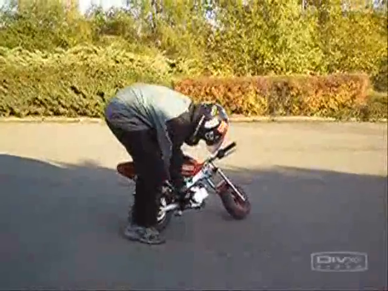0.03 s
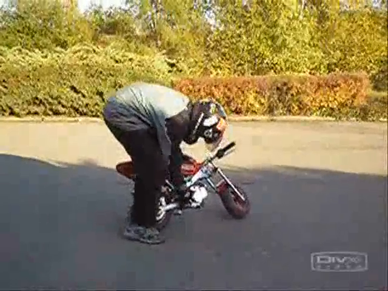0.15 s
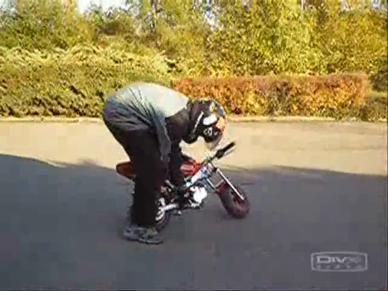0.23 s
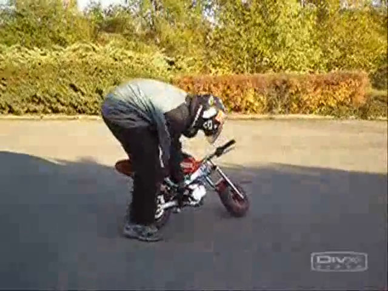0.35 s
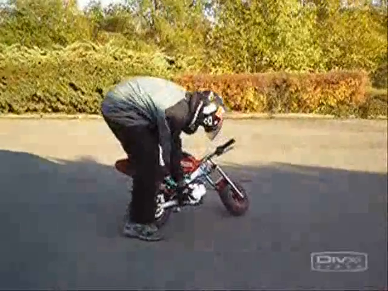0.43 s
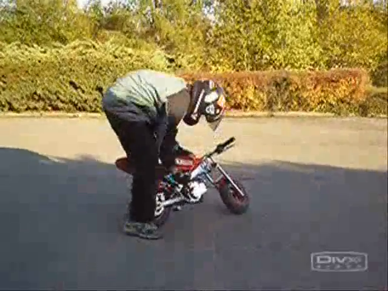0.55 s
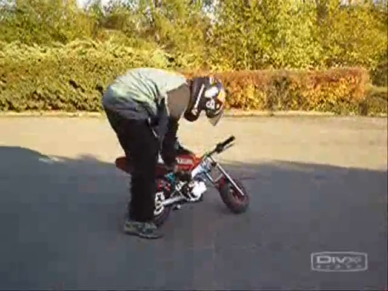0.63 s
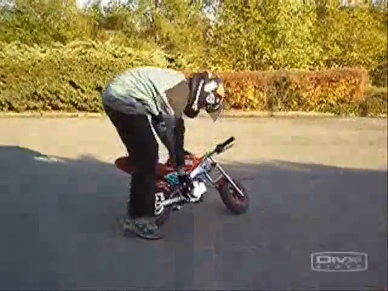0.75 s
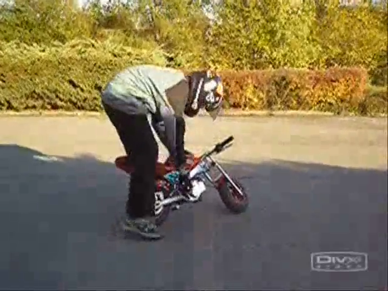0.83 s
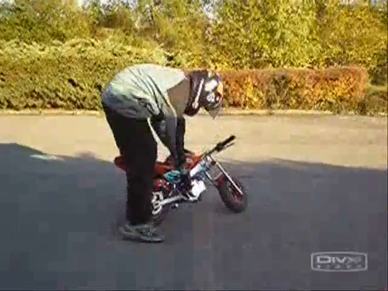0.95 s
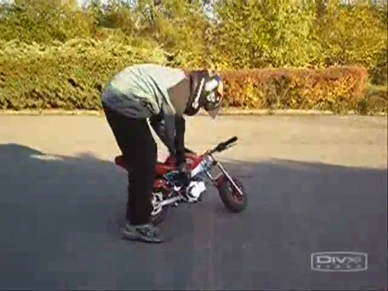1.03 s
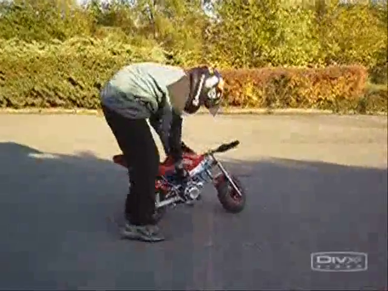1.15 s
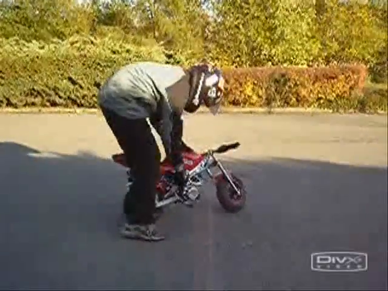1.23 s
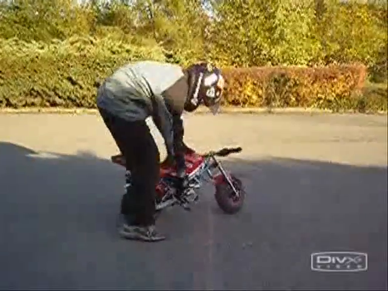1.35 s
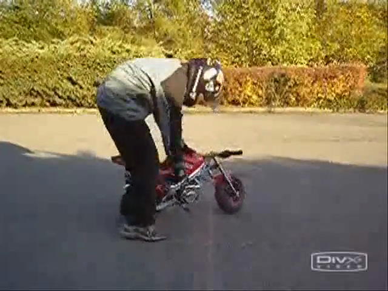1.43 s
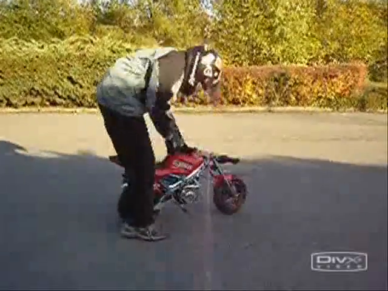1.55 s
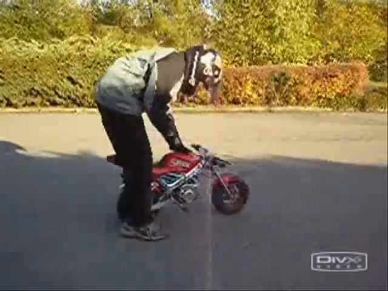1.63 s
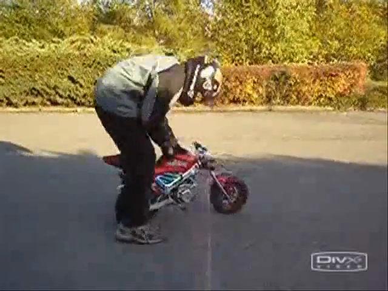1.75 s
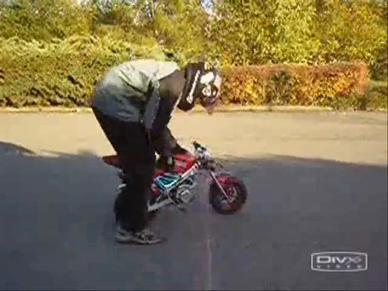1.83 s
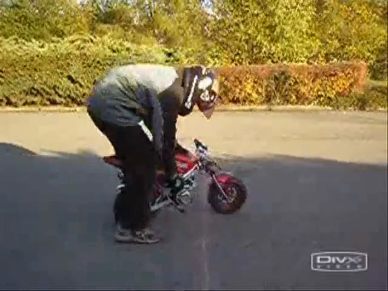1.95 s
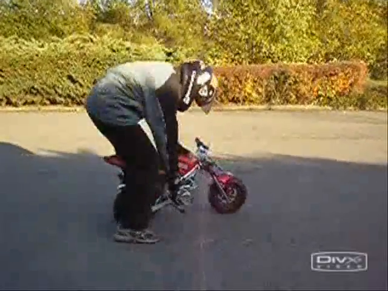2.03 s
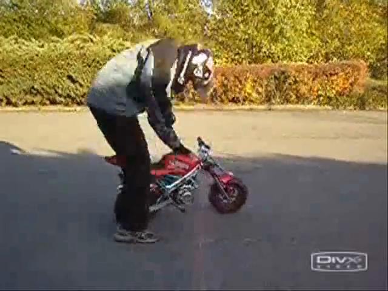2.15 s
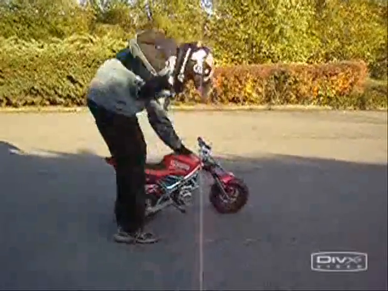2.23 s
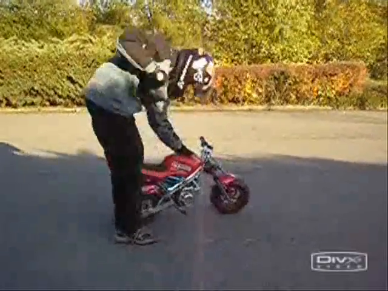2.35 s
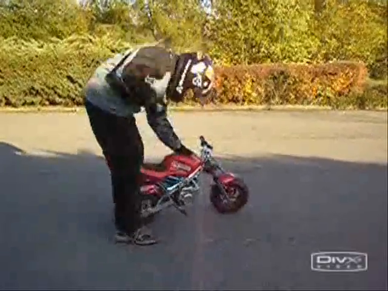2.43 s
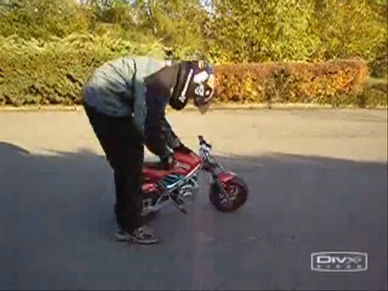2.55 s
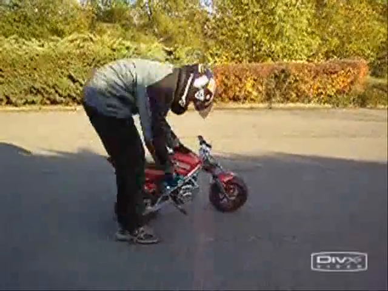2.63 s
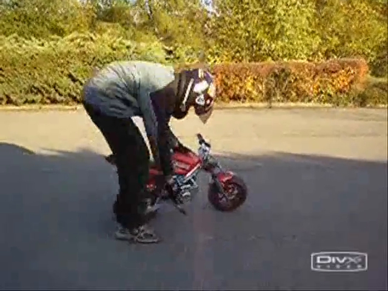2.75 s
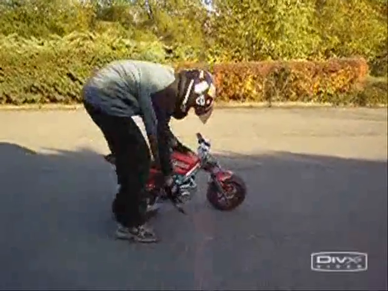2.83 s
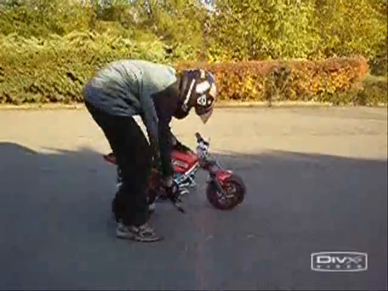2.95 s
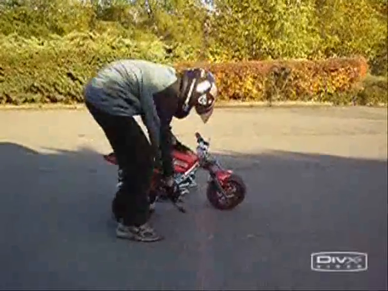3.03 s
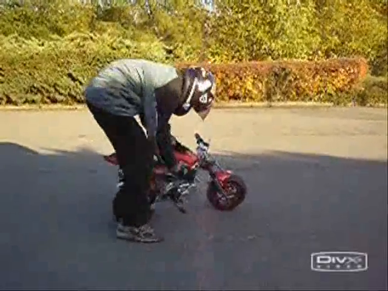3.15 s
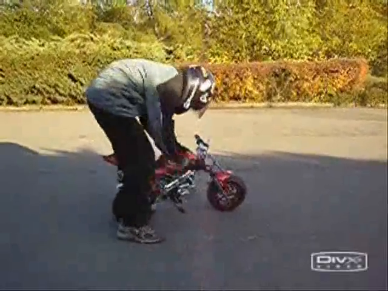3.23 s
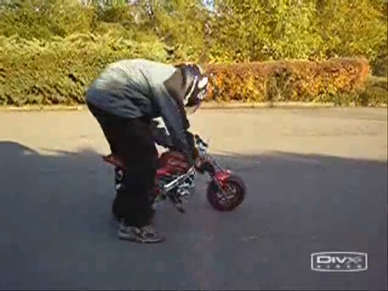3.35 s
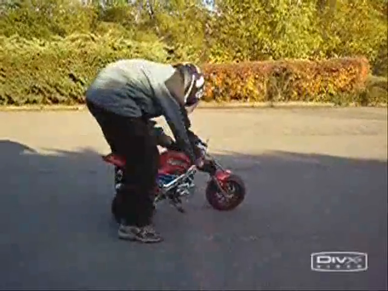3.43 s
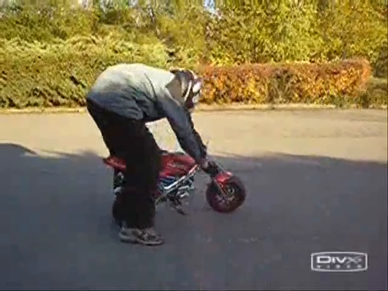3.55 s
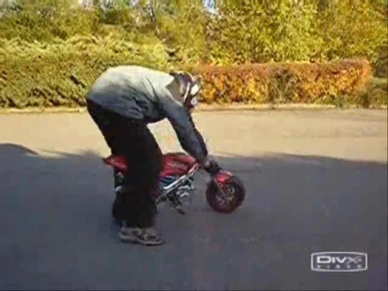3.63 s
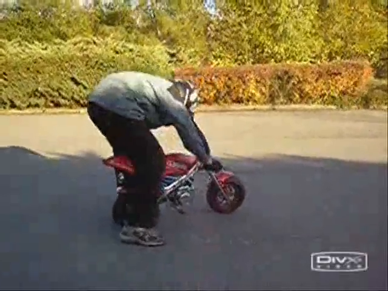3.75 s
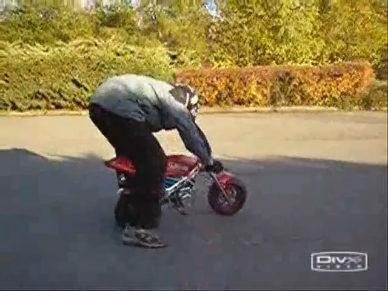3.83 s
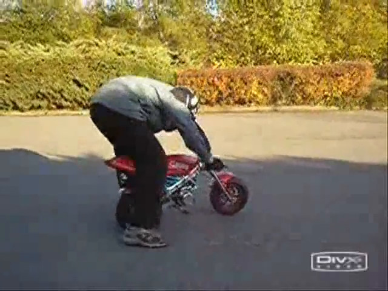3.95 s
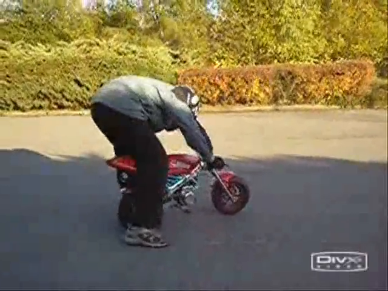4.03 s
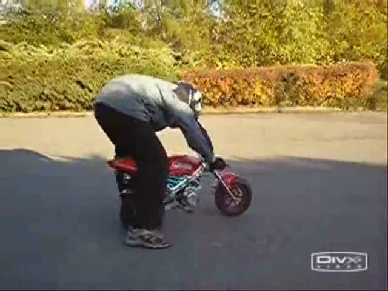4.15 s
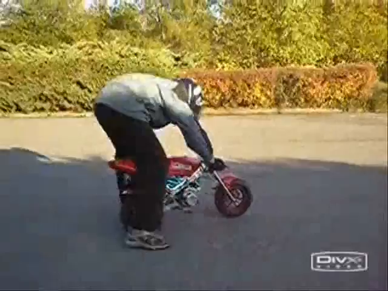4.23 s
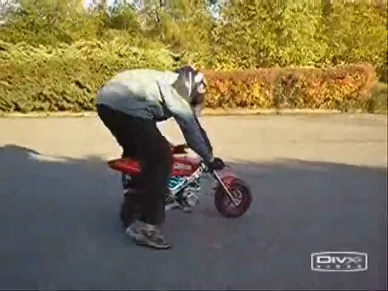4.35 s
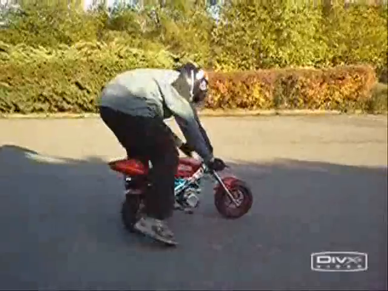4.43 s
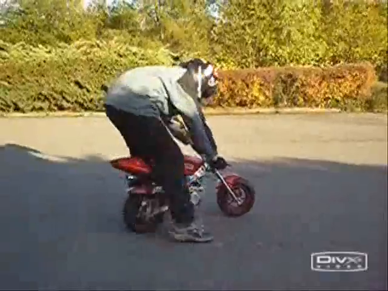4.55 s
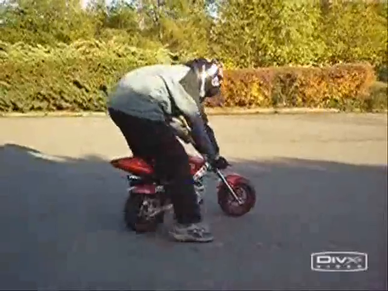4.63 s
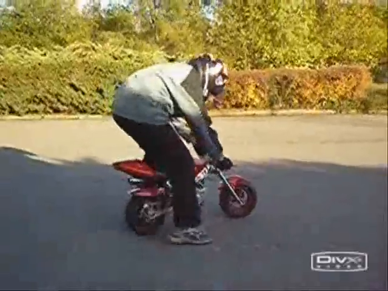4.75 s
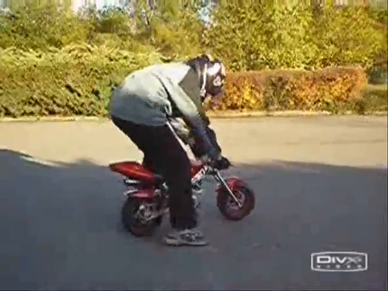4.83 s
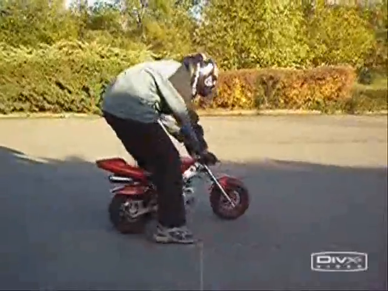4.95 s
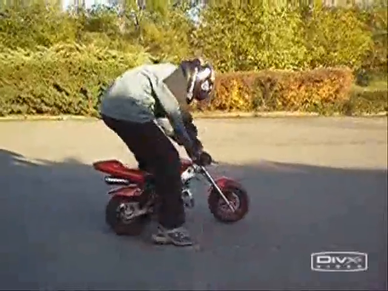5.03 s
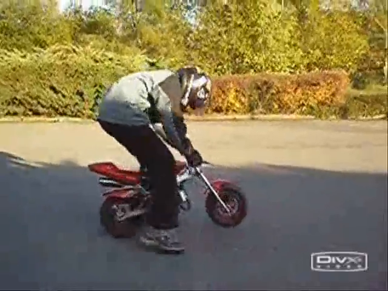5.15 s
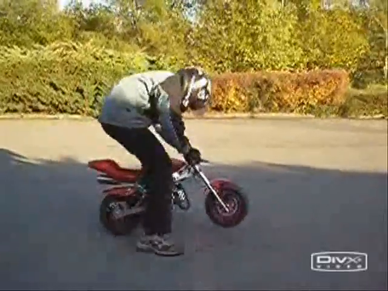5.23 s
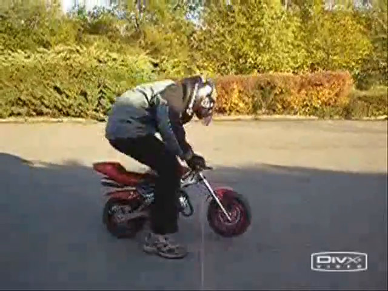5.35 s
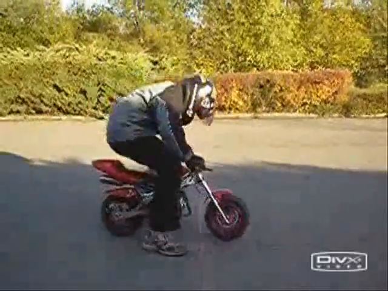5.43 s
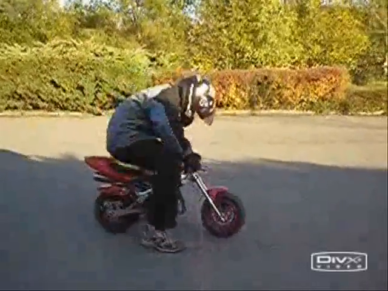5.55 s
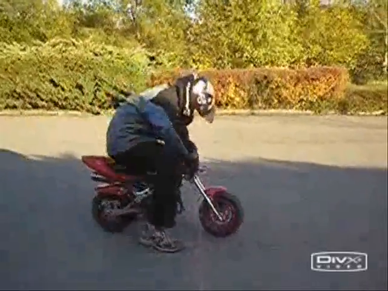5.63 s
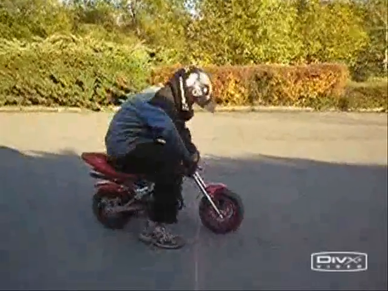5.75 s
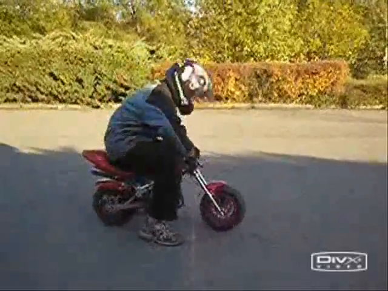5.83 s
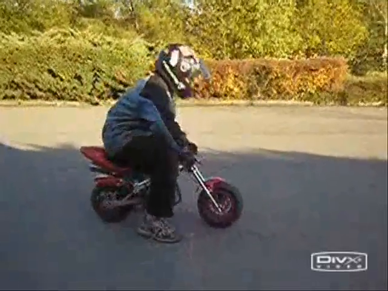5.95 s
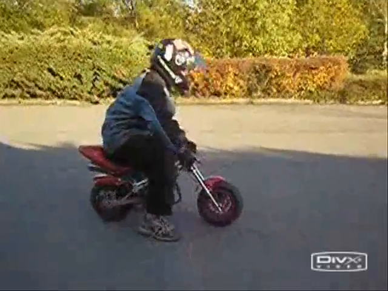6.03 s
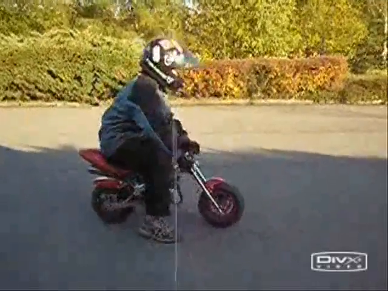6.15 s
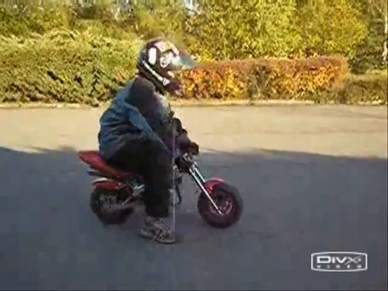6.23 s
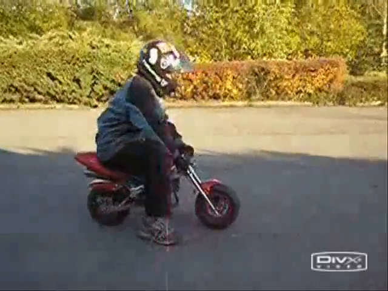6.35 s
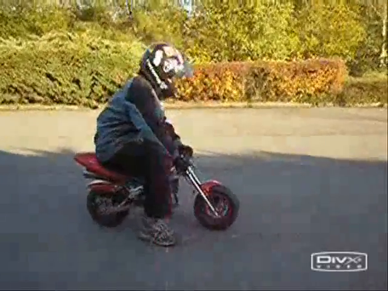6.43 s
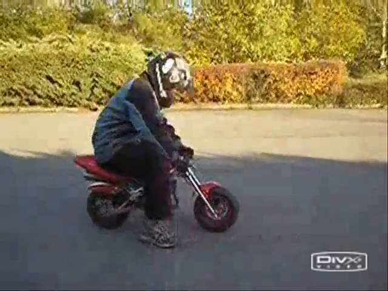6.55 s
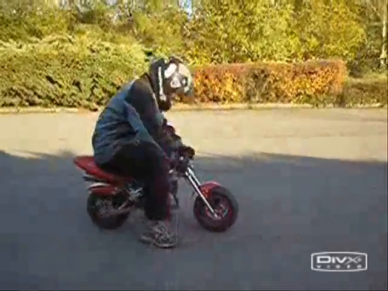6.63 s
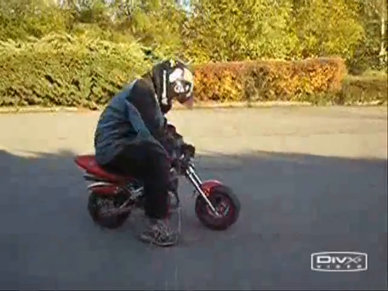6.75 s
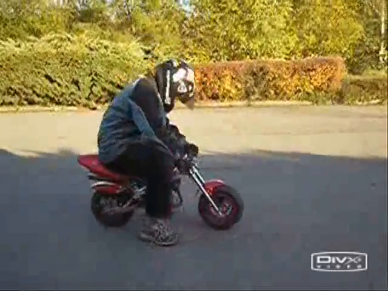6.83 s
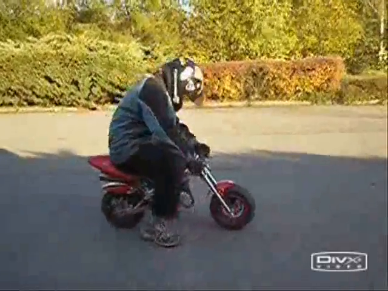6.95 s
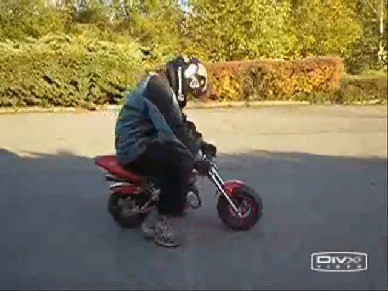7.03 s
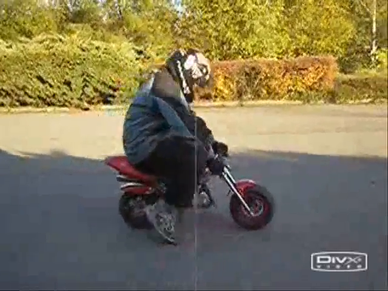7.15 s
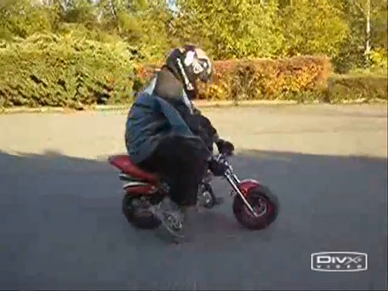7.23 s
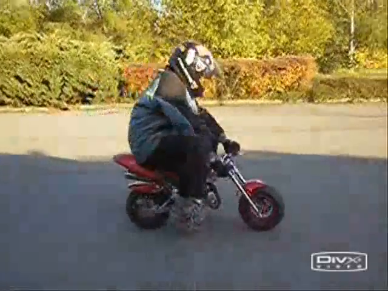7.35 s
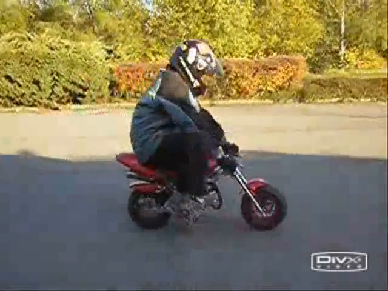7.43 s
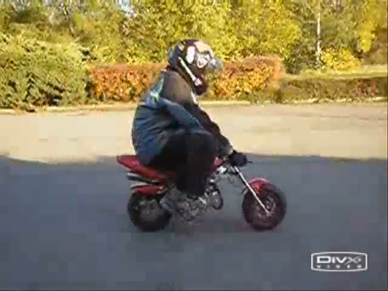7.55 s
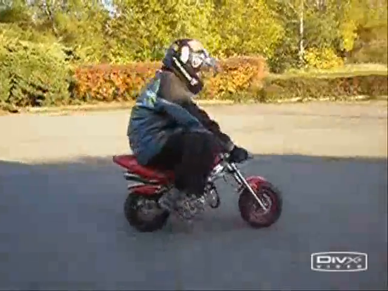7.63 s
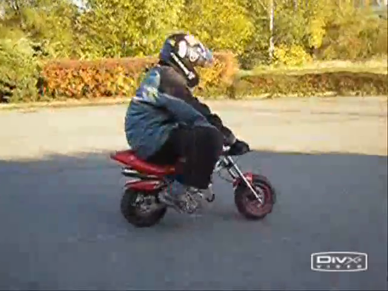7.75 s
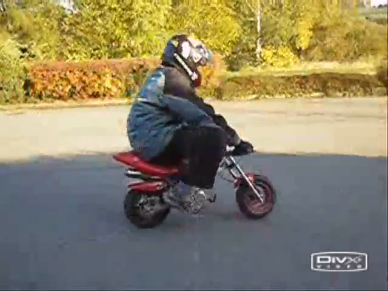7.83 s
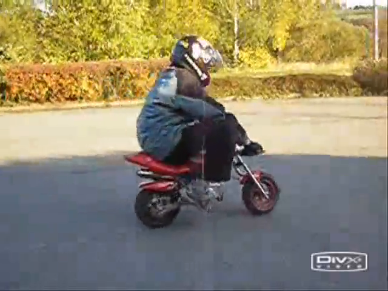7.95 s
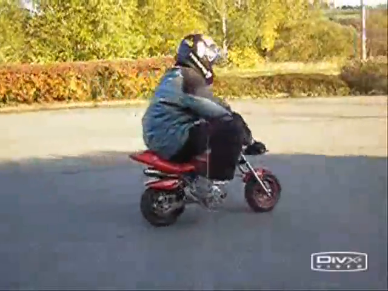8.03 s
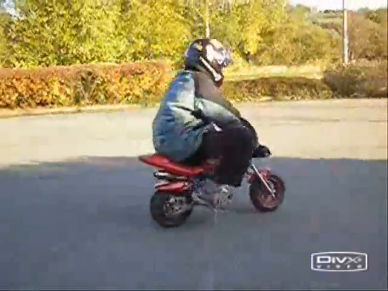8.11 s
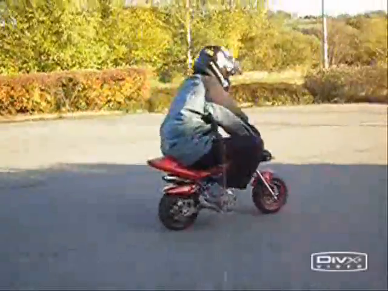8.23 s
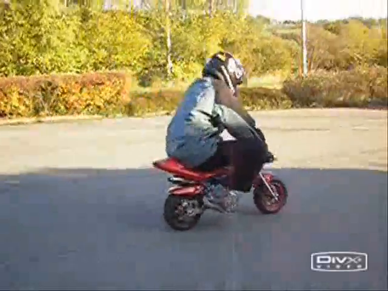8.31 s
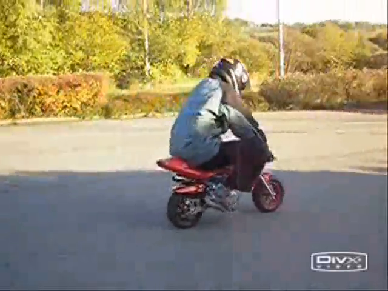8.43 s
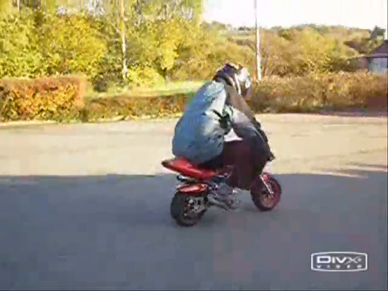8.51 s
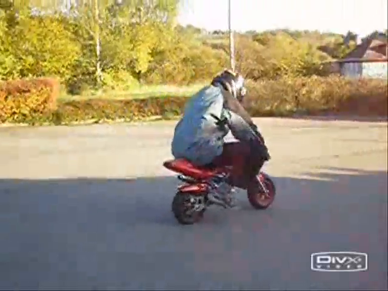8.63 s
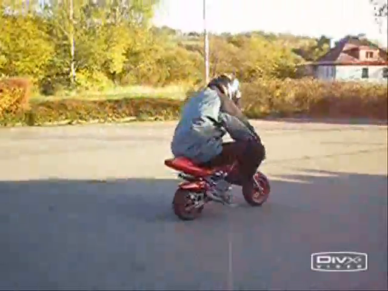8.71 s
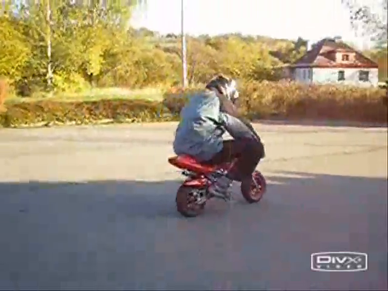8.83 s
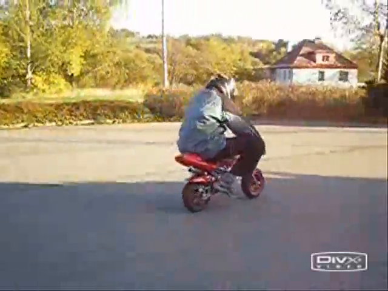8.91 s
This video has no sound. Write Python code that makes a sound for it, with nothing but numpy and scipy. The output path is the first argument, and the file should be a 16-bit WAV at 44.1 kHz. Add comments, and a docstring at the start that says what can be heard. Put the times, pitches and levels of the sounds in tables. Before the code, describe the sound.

Metal ticks and knocks, two rattling starter-cord pulls, then a tiny engine catches, sputters in a singing, uneven idle and revs into a steady drone.

```python
"""A two-stroke minibike on a paved lot coughs into a fast, ragged idle, then fires evenly as it rides off.
Puffs of gas from each turn of the crank boom in the silencer, bark in the pipe and rattle the engine.
Before that it is handled and pull-started: ticks, knocks of frame and steel, a clattering cord pulley.
At idle the clutch shoes graze their drum and it sings; a thin whine joins as the drive takes the load.
The place is open air, the distance a few metres, the microphone that of a small narrow-band camera."""
import sys
import numpy as np
from scipy import signal
from scipy.fft import rfft, irfft, next_fast_len
from scipy.io import wavfile
from scipy.ndimage import uniform_filter1d, map_coordinates

SR = 44100
rng = np.random.default_rng(int(sys.argv[2]) if len(sys.argv) > 2 else 0)


def dump(signal):
    """Clip the signal to [-1, 1] and save it as 16-bit WAV at the path in sys.argv[1]."""
    limited = np.clip(np.atleast_2d(signal).T, -1, 1)
    pcm = np.round(limited * 32767).astype(np.int16)
    wavfile.write(sys.argv[1], SR, pcm)


N = 396018

# Levels in the tables are relative: each layer has its own trim where it is mixed.

# Outdoor air, relative spectrum: freq_hz [Hz], level_db [dB]
AIR_SPECTRUM = [(30, -37), (60, -28), (95, -12), (170, -3.5), (260, -3.5), (400, -6), (600, -5), (900, -7),
                (1400, -16), (2200, -17), (3000, -18.5), (3950, -28), (5000, -45.5)]
# Echo of the lot: freq_hz [Hz], t60_s [s]
LOT_DECAY = [(200, 0.18), (1500, 0.17), (5000, 0.14)]
# Small ticks while the bike is handled: start_s [s], level_db [dB]
FUMBLE_LEVEL = [(0, -73), (.6, -56), (1.1, -50), (1.6, -42), (2.15, -45.5), (2.4, -36), (2.6, -65)]

# Knocks of frame, stand, starter pawls and clutch:
# start_s [s], body_db [dB], clank_db [dB], click_db [dB], ring_hz [Hz]
KNOCK_EVENTS = [(0.803, -43, -26, -29.5, 2220), (0.949, -26, -31, -33, 2410),
                (1.012, -29, -31.5, -33, 2680), (1.128, -20, -34, -54, 1730), (1.164, -15, -24, -27, 1720),
                (1.205, -28, -31, -26, 2140), (1.266, -24.5, -31, -26, 2360), (1.296, -40, -30, -24, 2250),
                (1.348, -21, -33, -27.5, 2200), (1.402, -29, -50, -30, 2670),
                (1.516, -23.5, -27.5, -21, 2500), (1.643, -21.5, -25.5, -24, 2480),
                (1.653, -18, -10, -9, 2020), (1.71, -26.5, -24.5, -19, 2120),
                (1.758, -13.5, -16.5, -26.5, 1770), (1.824, -10.5, -20.5, -24, 2060),
                (1.871, -13.5, -27.5, -20, 1990), (1.93, -6, -10.5, -11.5, 2650),
                (1.985, -15.5, -21.5, -17.5, 2430), (2.032, -25, -29, -10, 2360),
                (2.049, -20, -36, -12, 1697), (2.087, -20, -39, -20, 2400), (2.256, -19, -30, -27.5, 2416),
                (2.292, -11.5, -7.5, -4, 1886), (2.466, -19, -15, -11.5, 2500),
                (2.49, -18.5, -21.5, -18, 2130), (6.811, -12, -17, -20.5, 2250)]
# Rattle of a knock, low and high, relative spectra: freq_hz [Hz], level_db [dB]
CLANK_SPECTRUM = [(120, -15.5), (250, -4.5), (450, -15.5), (620, 3.5), (850, 2.5), (1200, -3), (1500, -14),
                  (2200, -27.5)]
CLICK_SPECTRUM = [(1100, -26), (1750, -0.5), (2250, 8), (2900, 6.5), (3400, -9), (3950, -7), (5000, -36.5)]
# Ringing of frame and steel: pitch_hz [Hz], level_db [dB], t60_s [s]
FRAME_RINGING = [(491, 0.5, 0.14), (563.2, 3, 0.11), (647, -8, 0.13), (706, -22.5, .05)]
STEEL_RINGING = [(2920, -11.5, .08), (3620, -1.5, 0.13)]
KNOCK_RISE_S = 0.0035

# Runs of the starter cord: start_s [s], full_speed_s [s], release_s [s], whirr_db [dB], ratchet_db [dB]
CORD_PULLS = [(1.667, 1.935, 2.045, -19.5, -22.5), (2.294, 2.52, 2.506, -18.5, -16.5)]
# The pulley gathers speed, then spins down
WHIRR_RISE_DB, RATCHET_RISE_DB, CORD_FALL_DB_PER_S = 13, 17, 233
# First slow strokes booming in the silencer: start_s [s], pitch_hz [Hz], level_db [dB], swell_s [s]
COUGH_EVENTS = [(1.722, 179, -10, 0.0058), (2.339, 183, -3.5, 0.0051), (2.355, 226.7, -11.5, 0.012),
                (2.388, 196.3, -2, 0.0036), (2.398, 203, -19, 0.0051), (2.444, 195, -7.5, 0.007),
                (2.462, 225.7, -11, 0.007)]

# Whine of the drive once the clutch grips: start_s [s], pitch_hz [Hz], level_db [dB]
DRIVE_WHINE = [(6.6, 3490, -51), (6.85, 3600, -29.5), (7.05, 3630, -35), (7.3, 3620, -40),
               (7.6, 3596, -58.5), (7.9, 3714, -36), (8.3, 3677, -43), (8.98, 3620, -40.5)]

# How hard the shoes graze the clutch drum: start_s [s], level_db [dB]
DRUM_GRAZING = [(2.48, -33.5), (2.55, -22), (2.8, -19.5), (3.3, -20.5), (3.65, -16.5), (3.8, -19.5),
                (4.3, -18), (4.78, -14), (5.05, -18.5), (5.4, -27), (5.7, -17.5), (5.83, -25.5),
                (6.05, -17.5), (6.3, -23.5), (6.75, -22), (6.9, -34.5)]
# Low and high ringing of the drum: pitch_hz [Hz], level_db [dB], t60_s [s]
DRUM_LOW_MODES = [(1224, 0, 0.12)]
DRUM_HIGH_MODES = [(2427, 4, 0.11), (2850, -5.5, 0.28), (3540, -15, 0.068)]
OVERTONE_DB = -28.5  # the drum's high modes, before their trims
OVERTONE_GROWS, OVERTONE_FOLLOWS = 1.2, 0.5  # their dB per dB of effort, and per dB of grazing

# Crankshaft at idle, and once the throttle opens: start_s [s], speed [revolutions per second]
IDLE_REVS_CURVE = [(2.5, 49.5), (2.66, 55.1), (2.98, 61.5), (3.09, 71.5), (3.23, 69.5), (3.39, 73.9),
                   (3.58, 73.6), (3.7, 79.7), (3.88, 76.7), (4.1, 81.1), (4.25, 78.3), (4.33, 81.7),
                   (4.77, 82.5), (4.96, 80.2), (5.73, 77.4), (5.87, 80.8), (6.3, 83.7), (6.69, 82.6)]
RIDE_REVS_CURVE = [(6.7, 83.4), (6.78, 89.3), (6.87, 94.6), (6.93, 97.1), (7.05, 98.8), (8.03, 99.7),
                   (8.1, 98.8), (8.98, 99.4)]

# Exhaust level on the ride: start_s [s], level_db [dB]
RIDE_LEVEL = [(6.82, -17), (6.9, -20), (7.1, -16.5), (7.88, -15.5), (7.95, -19), (8.1, -16), (8.3, -20),
              (8.62, -17), (8.98, -18.5)]
# Exhaust note under load, from the side and from behind: multiple of crank speed [1], level_db [dB]
SIDE_HARMONICS = [(1, -22), (2, 0.5), (3, -9), (4, -13), (5, 2), (6, -3), (7, 1), (8, -2), (9, -1.5),
                  (10, -5.5), (11, -0.5), (12, 2), (13, -1), (14, -4.5), (15, -36.5), (16, -12.5), (17, -6),
                  (18, -34.5)]
REAR_HARMONICS = [(1, -4.5), (2, 7.5), (3, 3), (4, -14), (5, -3.5), (6, -10.5), (7, -4), (8, -3.5), (9, 4),
                  (10, -16.5), (11, -4.5), (12, 2), (13, -8.5), (14, -12), (15, -23.5), (16, -18),
                  (17, -17.5), (18, -26)]
# Rasp under load, from the side and from behind, relative spectra: freq_hz [Hz], level_db [dB]
LOAD_RASP_SPECTRUM = [(1300, -28.5), (1520, -6), (1660, 1), (1900, -8), (2150, 2.5), (2520, 5.5),
                      (2680, -7.5), (2850, 7.5), (3120, -5), (3400, -10.5), (3700, -9.5), (3950, -15),
                      (5000, -40.5)]
REAR_RASP_SPECTRUM = [(1300, -34), (1520, -5), (1730, 3), (1900, -8), (2150, 4), (2500, -0.5), (2900, 0),
                      (3300, -2), (3700, -15), (3950, -16), (5000, -35)]
RIDE_BOOM_DB, RIDE_BARK_DB, RIDE_RASP_DB = -23.5, -1, -22.5  # boom and rasp from the side; bark over RIDE_LEVEL
AWAY_BOOM_DB, AWAY_RASP_DB = -1.5, -3.5  # change as the bike turns away
RIDE_FOLLOWS = 0.61  # share of the exhaust's swings heard in boom and rasp

# How hard the idle burns: start_s [s], level_db [dB]
IDLE_EFFORT = [(2.56, -28), (2.65, -22), (2.76, -22), (2.9, -17), (3.35, -18.5), (3.78, -18.5),
               (4.05, -22.5), (4.32, -18.5), (4.45, -20.5), (4.8, -16.5), (5.08, -20.5), (5.5, -17.5),
               (5.72, -20), (6.3, -17.5), (6.8, -17)]
# Clearest misfires: start_s [s], depth_db [dB], of which each layer takes a share
MISFIRE_EVENTS = [(2.576, 6), (3.404, -1), (3.484, 2), (3.531, 6), (3.585, 5.5), (3.72, 6), (3.778, 3),
                  (3.835, 6.5), (4.039, 4.5), (4.389, 6), (4.441, 6.5), (5.034, 3), (5.124, 4.5),
                  (5.335, 8), (5.47, 6), (5.58, 5), (5.64, 4.5), (5.742, 5), (5.885, 1), (6.067, 5.5),
                  (6.125, 5.5), (6.179, 4.5), (6.295, 4.5)]
# Half width of the gap; the unburnt charge goes off harder just after it
MISS_S, REBOUND_S, REBOUND_SHARE = 0.012, 0.025, 0.23
# Steady crank tone at idle: multiple of crank speed [1], level_db [dB]
IDLE_HARMONICS = [(1, -23), (2, -3), (3, 0), (4, -10), (5, -8), (6, -7), (7, -6), (8, -8), (9, -13),
                  (10, -10), (11, -11), (12, -13), (13, -15), (14, -10)]
# Boom of the silencer, bark of the pipe, rasp of the engine, relative spectra: freq_hz [Hz], level_db [dB]
BOOM_SPECTRUM = [(40, -44), (75, -17), (115, -5.5), (160, -4), (205, 7.5), (255, -3), (320, -9),
                 (450, -36.5)]
BARK_SPECTRUM = [(230, -29.5), (320, -9.5), (400, -1), (490, -1.5), (600, -0.5), (700, -2.5), (800, 3.5),
                 (950, -9), (1130, -0.5), (1330, -3), (1470, -19), (1700, -15), (2400, -49.5)]
RASP_SPECTRUM = [(1200, -42), (1480, -11), (1650, -3), (1950, -5.5), (2120, 0), (2400, -1), (2650, 0),
                 (2900, -1.5), (3150, -4.5), (3450, -15), (3700, -13), (3950, -22), (5000, -38)]
# Hollow ringing of the pipe: pitch_hz [Hz], level_db [dB], t60_s [s]
PIPE_RINGING = [(730, -14.5, 0.03), (781, 6.5, 0.11)]
IDLE_REVS = 82.7  # revolutions per second of the settled idle
BOOM_DB, BARK_DB, RASP_DB, PIPE_DB = 0.84, 0.25, -3, -10  # layers of the idle, over the effort
BOOM_FOLLOWS, BOOM_DB_PER_REV = 0.34, 0.1534  # the boom follows part of the effort and grows at lower revs
SEATED_DB = 0.5  # extra bark once the rider sits
EVEN_SHARE, EVEN_PER_REV = 0.7, 0.027  # share of steady tone at idle speed, and its rise with speed

# Output filter of the camera: freq_hz [Hz], level_db [dB]
CAMERA_SMOOTHING = [(3950, 0.5), (4250, -7), (4550, -15), (4900, -29.5), (5150, -32)]
CAMERA_HZ, TOP_HZ = 7900, 5120  # sampling rate of the camera, and the top of its output


def amp(db):
    """Decibels to gain."""
    return 10 ** (np.asarray(db) / 20)


def clock():
    """The time of every sample in seconds."""
    return np.arange(N) / SR


def curves(rows):
    """One value per sample for each column after the time."""
    times, *columns = np.transpose(rows)
    return [np.interp(clock(), times, column) for column in columns]


def mean_level(rows):
    """Mean of the second column of a table."""
    return np.mean(rows, axis=0)[1]


def ramp(start, end):
    """A fade from 0 to 1 between two times."""
    return np.clip((clock() - start) / max(end - start, 1 / SR), 0, 1)


def along(points, hz):
    """A table of (Hz, value) read along a log frequency axis."""
    freq, value = np.transpose(points)
    return np.interp(np.log(hz + 1), np.log(freq + 1), value)


def wobble(rate):
    """A smooth random curve, rate knots a second."""
    return map_coordinates(rng.standard_normal(N // 20), [clock() * rate], mode="wrap")


def steady(x, size=4000):
    """The sound brought to a running rms of about 1."""
    power = np.abs(uniform_filter1d(uniform_filter1d(x * x, size), size // 2))
    floor = np.mean(x * x) / 10 ** 4
    return x / np.sqrt(power + floor)


def through(x, kernel):
    """The sound played through an impulse response."""
    return signal.fftconvolve(x, kernel)[:N]


def filtered(x, gain):
    """The sound times a gain that depends on frequency."""
    size = next_fast_len(N + SR // 2)
    return irfft(rfft(x, size) * gain(np.fft.rfftfreq(size, 1 / SR)), size)[:N]


def body(spectrum, size=4096):
    """Causal (minimum-phase) impulse response of energy 1 with the shape of a spectrum."""
    cepstrum = irfft(np.log(amp(along(spectrum, np.fft.rfftfreq(size, 1 / SR)))))
    cepstrum[1:size // 2] *= 2
    cepstrum[size // 2 + 1:] = 0
    kernel = irfft(np.exp(rfft(cepstrum)))
    return kernel / np.linalg.norm(kernel)


def ringing(modes):
    """Impulse response of a set of damped modes."""
    t = np.arange(SR // 3) / SR
    return sum(amp(db - 60 * t / t60) * np.sin(2 * np.pi * hz * t) for hz, db, t60 in modes)


def noise(spectrum):
    """Coloured noise of rms about 1."""
    return through(rng.standard_normal(N), body(spectrum))


def taps(times, sizes):
    """Impulses placed between samples."""
    at = np.clip(times * SR, 0, N - 2)
    whole = at.astype(int)
    part = at - whole
    return np.bincount(whole, sizes * (1 - part), N) + np.bincount(whole + 1, sizes * part, N)


def ticks(per_second, centre_hz, spread, life, scatter_db):
    """A stream of small metal contacts, each with its own pitch and size, of running rms about 1."""
    chance = rng.standard_normal((int(per_second * N / SR), 2))
    t = np.arange(SR // 50) / SR
    hz = np.clip(centre_hz * np.exp(spread * chance[:, :1]), 200, 3400)
    size_db = scatter_db * np.clip(chance[:, 1:], -2, 2)
    grains = amp(size_db - 60 * t / life) * np.sin(2 * np.pi * hz * t)
    at = rng.integers(0, N, (len(chance), 1)) + np.arange(len(t))
    return steady(np.bincount(at.ravel(), grains.ravel(), N)[:N])


def strokes(turns, force, second, jitter_ms, scatter_db, rough, fade):
    """Two puffs a revolution, exhaust and then intake: each a pressure step and a dying rush of gas."""
    half = np.arange(int(2 * turns[-1]))
    chance = rng.standard_normal((2000, 2))[half]
    times = np.interp(half / 2, turns, clock())
    strength = np.where(half % 2, second, 1)
    sizes = np.interp(times, clock(), force) * strength * amp(scatter_db * chance[:, 0])
    steps = taps(times + jitter_ms * chance[:, 1] / 1000, sizes)
    dying = amp(-60 * np.arange(SR // 10) / SR / fade)
    rush = np.abs(through(np.abs(steps), dying)) * rng.standard_normal(N)
    rough = np.clip(rough, 0, 1)
    return np.sqrt(1 - rough) * steady(steps) + np.sqrt(rough) * steady(rush)


def outdoor_air():
    """Coloured noise of the open air, its level drifting slowly."""
    return amp(-39.5 + 0.73 * wobble(2.4)) * noise(AIR_SPECTRUM)


def lot(x, wet_db):
    """The direct sound and its short scatter from ground, bike and hedge: noise decaying band by band."""
    hz, t, bands = signal.stft(rng.standard_normal(SR // 3), SR, nperseg=256)
    decay = amp(-60 * t / along(LOT_DECAY, hz)[:, None])
    tail = signal.istft(bands * decay, SR, nperseg=256)[1]
    return x + amp(wet_db) * through(x, tail / np.linalg.norm(tail))


def fumbling():
    """A faint stream of small overlapping metal ticks as the bike is handled."""
    level = amp(curves(FUMBLE_LEVEL)[0])
    return level * ticks(67, centre_hz=2060, spread=0.26, life=0.057, scatter_db=2.5)


def knocks():
    """Each knock is a brief rattle with a pitch of its own that also rings frame and steel."""
    t = np.arange(SR // 5) / SR
    frame, steel, clank, click, ring = np.zeros((5, N))
    swell = 1 - np.exp(-(t / KNOCK_RISE_S) ** 2)
    shape = swell * (amp(-60 * t / 0.022) + amp(-27.5 - 60 * t / 0.027))
    for start_s, body_db, clank_db, click_db, ring_hz in KNOCK_EVENTS:
        at = round(start_s * SR)
        span = slice(at, at + len(t))
        frame[at] = amp(body_db - 10)
        steel[at] = amp(click_db - 23.5)
        clank[span] += amp(clank_db + 12) * shape
        click[span] += amp(click_db + 11) * shape
        ring[span] += amp(click_db + 6 - 60 * t / 0.025) * swell * np.sin(2 * np.pi * ring_hz * t)
    rattle = clank * steady(noise(CLANK_SPECTRUM), size=300) + click * steady(noise(CLICK_SPECTRUM), size=300)
    return rattle + ring + through(frame, ringing(FRAME_RINGING)) + through(steel, ringing(STEEL_RINGING))


def starter():
    """The cord spins the pulley up and lets it run down: its housing clatters and its pawls tick."""
    out = np.zeros(N)
    for start, full, release, whirr_db, ratchet_db in CORD_PULLS:
        slack = 1 - ramp(start, full) ** 2
        run_down = amp(-CORD_FALL_DB_PER_S * np.maximum(clock() - release, 0))
        running = ramp(start - 0.02, start) * run_down
        clatter = ticks(900, centre_hz=795, spread=0.6, life=0.075, scatter_db=-1.0)
        pawls = ticks(900, centre_hz=2454, spread=0.21, life=0.014, scatter_db=1.5)
        whirr = amp(whirr_db - WHIRR_RISE_DB * slack) * clatter
        ratchet = amp(ratchet_db - RATCHET_RISE_DB * slack) * pawls
        out += running * (whirr + ratchet)
    return out


def coughs():
    """Each of the first strokes swells and dies in a few cycles of the silencer's note."""
    out, t = np.zeros(N), np.arange(SR // 8) / SR
    for start_s, hz, db, swell in COUGH_EVENTS:
        shape = (t / swell * np.exp(1 - t / swell)) ** 2
        note = np.sin(2 * np.pi * hz * t) + amp(-14.5) * np.sin(2 * np.pi * 2.3 * hz * t)
        out[round(start_s * SR):][:len(t)] += amp(db) * shape * note
    return out


def drive():
    """A thin, unsteady whine as the drive takes up the load."""
    pitch_hz, level_db = curves(DRIVE_WHINE)
    phase = 2 * np.pi * np.cumsum(pitch_hz + 22 * wobble(110)) / SR
    return ramp(6.5, 6.6) * amp(level_db + 3.1 * wobble(20)) * np.sin(phase)


def clutch(turns, effort_db, stumble_db):
    """The loose shoes graze the steel drum: it sings a wavering note with an octave and rings at each graze."""
    graze_db = curves(DRUM_GRAZING)[0]
    tone_db = graze_db + 0.97 * stumble_db + wobble(22)
    over_db = OVERTONE_DB + OVERTONE_GROWS * (effort_db - mean_level(IDLE_EFFORT))
    over_db = over_db + OVERTONE_FOLLOWS * (graze_db - mean_level(DRUM_GRAZING))
    over_db = over_db + 0.9 * stumble_db + 2 * wobble(24)
    pitch_hz = DRUM_LOW_MODES[0][0] + 6 * wobble(12) + 6 * wobble(90)
    phase = 2 * np.pi * np.cumsum(pitch_hz) / SR
    flutter = steady(amp(2 * wobble(55)))
    song = flutter * (amp(tone_db + 1.5) * np.sin(phase) + amp(over_db - 0.5) * np.sin(2 * phase))
    grazes = strokes(turns, np.ones(N), second=0.37, jitter_ms=0.21, scatter_db=2.5, rough=0.12, fade=0.03)
    low_ring = amp(tone_db - 5) * steady(through(grazes, ringing(DRUM_LOW_MODES)))
    high_ring = amp(over_db - 2.5) * steady(through(grazes, ringing(DRUM_HIGH_MODES)))
    return song + low_ring + high_ring


def pulling(turns):
    """Under load every turn fires; the pipe's note changes as the bike swings its tail to the listener."""
    away = ramp(7.85, 8.73)
    level_db = curves(RIDE_LEVEL)[0]
    swing_db = RIDE_FOLLOWS * (level_db - mean_level(RIDE_LEVEL))
    boom_db = RIDE_BOOM_DB + swing_db + AWAY_BOOM_DB * away
    rasp_db = RIDE_RASP_DB + swing_db + AWAY_RASP_DB * away
    orders = []
    for (k, side_db), (_, rear_db) in zip(SIDE_HARMONICS, REAR_HARMONICS):
        order_db = side_db + away * (rear_db - side_db) + 0.5 * np.sqrt(k) * wobble(6)
        phase = 2 * np.pi * k * turns + 1.1 * rng.standard_normal() + 0.06 * k * wobble(30)
        orders.append(amp(order_db) * np.cos(phase))
    boom, bark = steady(sum(orders[:3])), steady(sum(orders[3:]))
    gas = strokes(turns, np.ones(N), second=0.82, jitter_ms=0.12, scatter_db=3.5, rough=0.6, fade=0.013)
    puffs = strokes(turns, np.ones(N), second=0.7, jitter_ms=0.04, scatter_db=0.7, rough=0.72, fade=0.04)
    side_rasp = (1 - away) * through(puffs, body(LOAD_RASP_SPECTRUM))
    rear_rasp = away * through(puffs, body(REAR_RASP_SPECTRUM))
    return (amp(boom_db) * boom
            + amp(level_db + RIDE_BARK_DB) * bark
            + amp(level_db - 9.5) * steady(through(gas, body(BARK_SPECTRUM)))
            + amp(rasp_db) * steady(side_rasp + rear_rasp))


def stumbles():
    """Level change in dB: each misfire leaves a gap, and a harder firing follows (a negative depth inverts it)."""
    db = np.zeros(N)
    for start_s, depth_db in MISFIRE_EVENTS:
        at = round(start_s * SR)
        near = slice(at - SR // 10, at + SR // 10)
        t = np.arange(near.start, near.stop) / SR - start_s
        gap = np.exp(-(t / MISS_S) ** 2)
        rebound = REBOUND_SHARE * np.exp(-((t - REBOUND_S) / MISS_S) ** 2)
        db[near] += depth_db * (rebound - gap)
    return db


def firing(turns, miss_db):
    """With the throttle shut the charge catches only every second to fourth turn; the turns between are weaker."""
    fired = np.cumsum(rng.choice([2, 3, 3, 4], N // 1000))
    last = np.append(0, fired)[np.searchsorted(fired, turns, side="right")]
    since = np.floor(turns) - last
    return amp(miss_db * np.sqrt(since))


def idle(turns, revs, effort_db, stumble_db):
    """Uneven firings boom in the silencer, bark in the pipe and rattle the engine over a steady crank tone."""
    seated = ramp(5.7, 5.7)  # a step: the pipe sounds hollower once the rider sits
    mean_db = mean_level(IDLE_EFFORT)
    boom_db = mean_db + BOOM_DB + BOOM_FOLLOWS * (effort_db - mean_db)
    boom_db = boom_db + BOOM_DB_PER_REV * (IDLE_REVS - revs) + 0.88 * stumble_db
    bark_db = effort_db + SEATED_DB * seated + 0.65 * stumble_db
    rasp_db = effort_db + RASP_DB + 0.62 * stumble_db
    even = np.clip(EVEN_SHARE + EVEN_PER_REV * (revs - IDLE_REVS), 0.02, 0.95)

    orders = []
    for k, order_db in IDLE_HARMONICS:
        phase = 2 * np.pi * (k * turns + rng.random()) + 0.12 * wobble(12)
        orders.append(amp(order_db + 2 * wobble(9)) * np.sin(phase))
    hum, buzz = steady(sum(orders[:4])), steady(sum(orders[4:]))

    force = firing(turns, miss_db=-3.5)
    thumps = strokes(turns, force, second=0.31, jitter_ms=0.99, scatter_db=2.5, rough=0.5, fade=0.022)
    puffs = strokes(turns, force, second=0.49, jitter_ms=0.15, scatter_db=0, rough=0.86, fade=0.05)
    rattles = strokes(turns, force, second=0.17, jitter_ms=0.52, scatter_db=2.0, rough=1.0, fade=0.082)
    boom = steady(through(thumps, body(BOOM_SPECTRUM)), size=2400)
    bark = steady(through(puffs, body(BARK_SPECTRUM)))
    hollow = steady(through(puffs, ringing(PIPE_RINGING)))
    rasp = steady(through(rattles, body(RASP_SPECTRUM)))
    return (amp(boom_db) * (np.sqrt(even) * hum + np.sqrt(1 - even) * boom)
            + amp(bark_db + BARK_DB) * (even * buzz + np.sqrt(1 - even ** 2) * bark)
            + amp(bark_db + PIPE_DB) * seated * hollow
            + amp(rasp_db) * rasp)


def scene():
    """Handling, start, idle and the ride off, over the outdoor air."""
    revs = curves(IDLE_REVS_CURVE + RIDE_REVS_CURVE)[0]
    turns = np.cumsum(revs) / SR
    effort_db, stumble_db = curves(IDLE_EFFORT)[0], stumbles()
    caught, gripped = ramp(2.49, 2.54), ramp(6.77, 6.835)
    start = lot(fumbling() + knocks() + starter() + coughs(), wet_db=-14.5)
    idling = clutch(turns, effort_db, stumble_db) + idle(turns, revs, effort_db, stumble_db)
    ragged = caught * np.sqrt(1 - gripped) * idling
    riding = np.sqrt(gripped) * pulling(turns) + drive()
    return (outdoor_air() + start + ragged + riding)[None]


def record(dry):
    """The camera rounds off the tallest peaks and samples slowly, so its band is mirrored faintly upward."""
    held = dry[0] / (1 + np.abs(dry[0] / 0.88) ** 6) ** (1 / 6)
    narrow = filtered(held, lambda hz: 1 / (1 + (2 * hz / CAMERA_HZ) ** 70))
    mirrored = narrow * (1 + 2 * np.cos(2 * np.pi * CAMERA_HZ * clock()))
    return filtered(mirrored, lambda hz: amp(along(CAMERA_SMOOTHING, hz)) / (1 + (hz / TOP_HZ) ** 80))[None]


dry = scene()
out = record(dry)
dump(out)
```